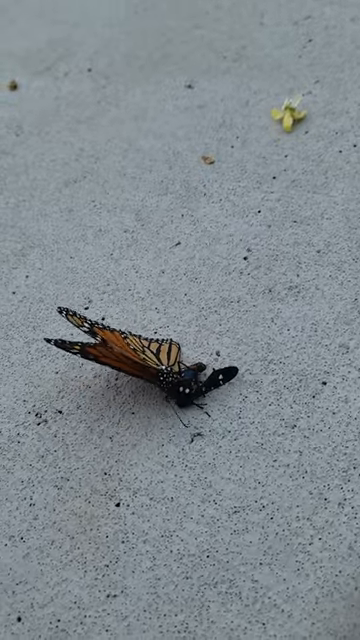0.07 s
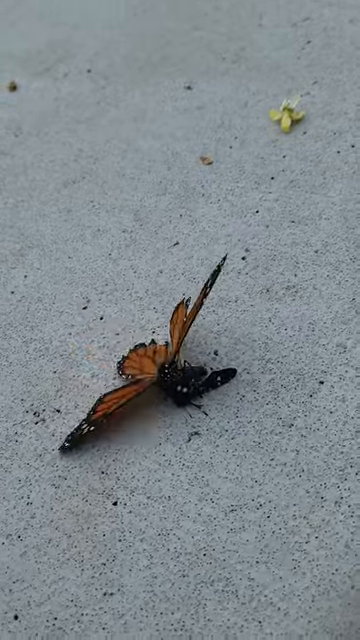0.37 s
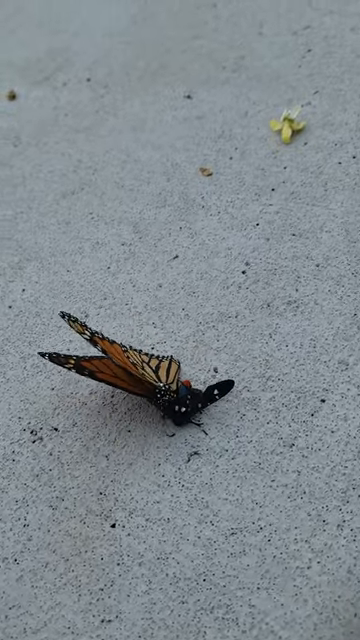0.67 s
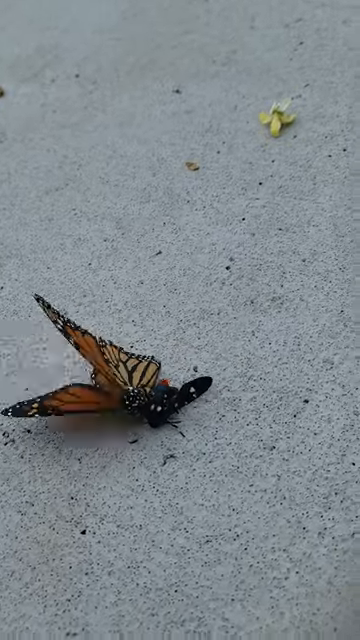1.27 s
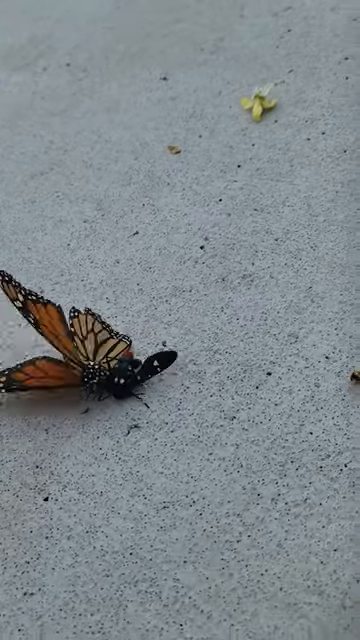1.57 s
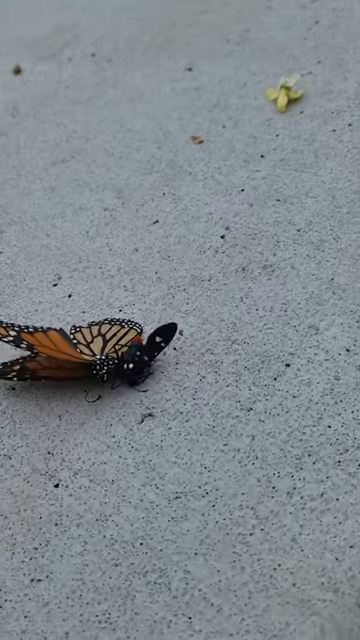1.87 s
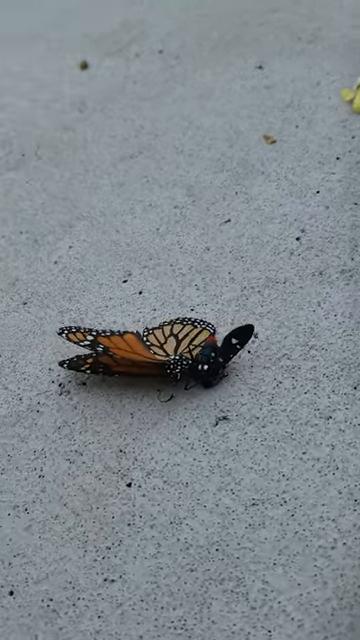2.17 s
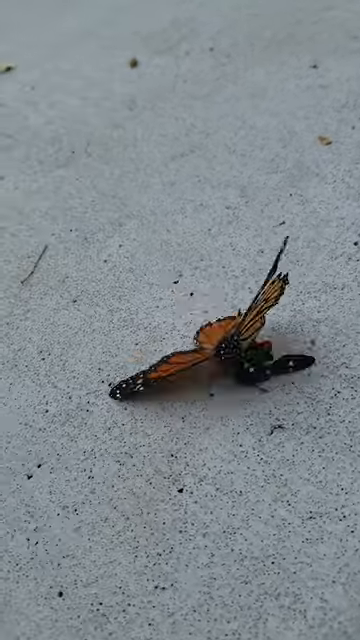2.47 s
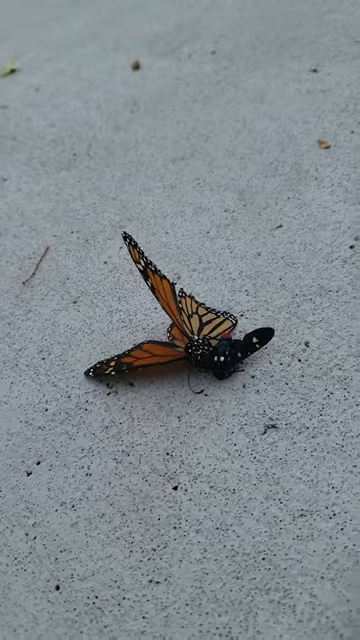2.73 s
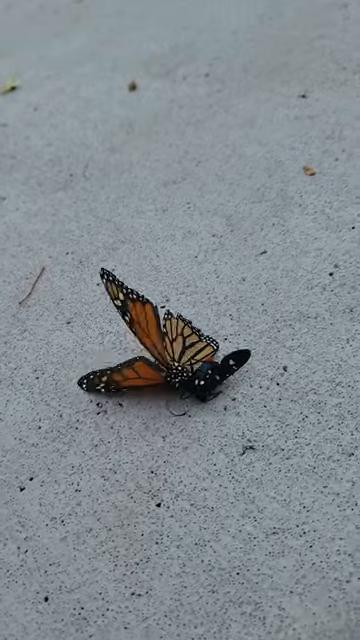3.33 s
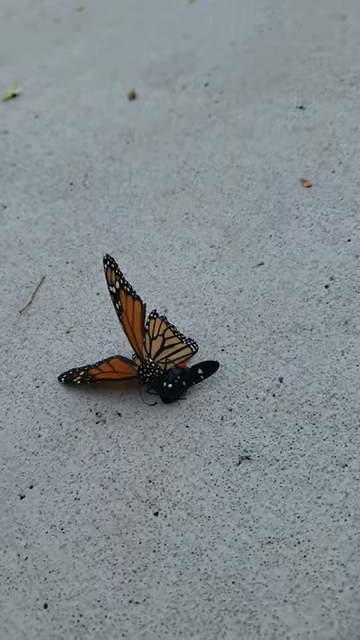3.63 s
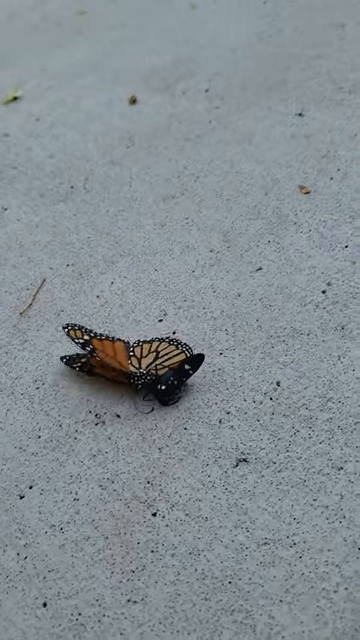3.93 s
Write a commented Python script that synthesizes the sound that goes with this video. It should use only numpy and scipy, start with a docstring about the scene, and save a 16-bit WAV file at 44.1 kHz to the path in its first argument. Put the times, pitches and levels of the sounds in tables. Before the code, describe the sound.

Fingers bump and click near the microphone outdoors while a breeze rumbles steadily.

```python
"""A concrete path outdoors, where a butterfly flaps and its wings faintly brush the ground.
Close to the right microphone, light contacts, probably fingers shifting on the case, give soft thuds,
dry ticks and a short rub. A breeze rumbles on both microphones.
Far off, birds whistle and twitter thinly over the hum of a town."""
import sys
import numpy as np
from scipy import signal
from scipy.fft import rfft, irfft
from scipy.io import wavfile
from scipy.ndimage import uniform_filter1d

SR = 44100
rng = np.random.default_rng(int(sys.argv[2]) if len(sys.argv) > 2 else 0)


def store_wav(level_fs):
    """Save 16-bit WAV to argv[1]."""
    pcm = np.round(np.clip(np.atleast_2d(level_fs), -1, 1) * 32767)
    wavfile.write(sys.argv[1], SR, pcm.T.astype(np.int16))


N = 176400
TIME = np.arange(N) / SR


def undb(db):
    """Decibels to gain."""
    return 10 ** (np.asarray(db) / 20)


def unit(x):
    """Scale to rms 1."""
    return x / np.sqrt(np.mean(x ** 2))


def colour(x, points):
    """Give x a spectrum of (Hz, relative dB) points; rms 1."""
    hz, db = np.array(points).T
    freqs = np.maximum(np.fft.rfftfreq(N, 1 / SR), 1)
    gain = undb(np.interp(np.log(freqs), np.log(hz), db))
    return unit(irfft(rfft(x) * gain, N))


def wander(rate):
    """A smooth random curve that changes rate times a second; rms 1."""
    hold = int(SR / rate)
    steps = np.repeat(rng.standard_normal(N // hold + 1), hold)
    return unit(uniform_filter1d(uniform_filter1d(steps, hold), hold)[:N])


def grains(rough_db):
    """Dense tiny clicks of uneven size."""
    return rng.standard_normal(N) * undb(rough_db * wander(1500))


def swells(rows):
    """Envelope of bell-shaped swells."""
    return sum(undb(db) * np.exp(-.5 * ((TIME - at) / half) ** 2) for at, half, db in rows)


def add(out, at, sound):
    """Mix a sound in at a time in seconds."""
    i = int(at * SR)
    out[i:i + len(sound)] += sound[:max(N - i, 0)]


def sides(left_db=0, right_db=0):
    """Gains for the two microphones."""
    return undb([[left_db], [right_db]])


# Wing strokes on the path. Each row: peak time and half length in seconds, level on the left in dB.
WING_STROKES = [(2.495, 0.034, -72.5), (2.62, 0.026, -74), (3.44, 0.043, -72.5), (3.555, 0.019, -75)]
# Their thin hiss. Each row: frequency in Hz, relative level in dB.
WING_SPECTRUM = [(3000, -27), (6000, -5), (8000, 4), (11000, 1.5), (13000, -13), (16000, -7)]

def wings():
    """Wing edges scrape over the grain of the concrete, left of centre."""
    scrape = np.array([colour(grains(rough_db=4), WING_SPECTRUM) for _ in range(2)])
    return scrape * swells(WING_STROKES) * sides(right_db=-7)


# Soft contacts close to the right microphone. Each row: time in seconds, thud level in dB,
# thud pitch in Hz, grit level in dB, grit decay time in seconds.
TOUCHES = [(1.173, -39.5, 221, -62.5, 0.037), (1.319, -37.5, 212, -55, 0.008),
           (1.408, -30, 161.4, -58.5, 0.032), (1.55, -30, 188, -57, 0.016), (1.743, -33, 168, -61, 0.011),
           (1.756, -27, 142, -55, 0.0057), (1.904, -29, 130, -53, 0.014), (2.016, -30, 134, -76, 0.012),
           (2.071, -26.5, 129, -54, 0.0071), (2.077, -25.5, 138, -64, 0.012),
           (2.123, -30.5, 127, -53, 0.0078), (2.14, -37, 124, -61, 0.038), (2.161, -25, 144, -55, 0.01),
           (2.175, -60, 151, -73, .009), (2.267, -21, 128, -58.5, 0.015), (2.407, -49, 170, -60, 0.0044),
           (2.947, -30.5, 163, -56, 0.023)]
# Friction on the case. Each row: frequency in Hz, relative level in dB.
GRIT_SPECTRUM = [(500, -25), (1000, 4), (3000, -6.5), (5500, -16.5), (9500, -15), (11500, -6.5),
                 (12600, -12), (13600, -24), (16000, -31)]
THUD_RISE_S, THUD_FALL_S = .003, .0098
GRIT_ROUGH_DB, GRIT_LEFT_DB = 2, -15

def touches():
    """Each soft contact thuds in the case and slides a little, with a gritty hiss."""
    t = TIME[:N // 20]
    thuds, slide = np.zeros(N), np.zeros(N)
    envelope = (1 - np.exp(-t / THUD_RISE_S)) ** 2 * np.exp(-t / THUD_FALL_S)
    envelope /= envelope.max()
    for at, thud_db, hz, grit_db, decay_s in TOUCHES:
        phase = 2 * np.pi * hz * t
        overtone = undb(-4) * np.sin(1.93 * phase) * np.exp(-t / .006)
        add(thuds, at - THUD_RISE_S, undb(thud_db) * envelope * (np.sin(phase) + overtone))
        add(slide, at, undb(grit_db) * np.exp(-t / decay_s))
    slide = uniform_filter1d(slide, size=260)  # the contact builds over a few ms
    grit = np.array([colour(grains(GRIT_ROUGH_DB), GRIT_SPECTRUM) for _ in range(2)])
    return thuds * sides(left_db=-20.5) + slide * grit * sides(left_db=GRIT_LEFT_DB)


# Dry ticks close to the right microphone. Each row: start in seconds, ring level in dB,
# ring pitch in Hz, snap level in dB, case level in dB.
TICKS = [(0.455, -48, 655, -63, -45), (1.744, -56, 1890, -49, -49), (1.905, -32.5, 1050, -43, -47),
         (2.017, -39, 1920, -39.5, -40.5), (2.127, -65, 1740, -66, -44), (2.1381, -55, 1860, -67, -43),
         (2.174, -45, 1940, -55, -45.5), (2.2627, -39.5, 1840, -40.5, -41.5),
         (2.408, -39.5, 1860, -43, -38.5)]
# Modes of the case. Each row: frequency in Hz, dB above the tick's case level, seconds to fall 60 dB.
CASE_MODES = [(217, 13.5, 0.02), (530, 11, 0.0059), (4200, -4, 0.0033), (6230, -19, 0.0027)]
RING_T60_S, RING_RISE_S, SNAP_DECAY_S = .008, .0002, .0005

def ticks():
    """A bright snap, then a few milliseconds of ringing in the case."""
    t = TIME[:N // 80]
    rings, snaps = np.zeros(N), np.zeros(N)

    def mode(hz, t60):
        """One damped resonance."""
        return np.sin(2 * np.pi * hz * t) * np.exp(-np.log(1000) * t / t60)

    case = sum(undb(db) * mode(hz, t60) for hz, db, t60 in CASE_MODES)
    attack = 1 - np.exp(-t / RING_RISE_S)
    for at, ring_db, hz, snap_db, case_db in TICKS:
        ring = undb(ring_db) * mode(hz, RING_T60_S) - undb(case_db) * case
        add(rings, at, ring * attack)
        add(snaps, at, undb(snap_db) * np.exp(-t / SNAP_DECAY_S))
    grit = colour(rng.standard_normal(N), GRIT_SPECTRUM)
    return (rings + snaps * grit) * sides(left_db=-18)


# Rubs on the case. Each row: peak time and half length in seconds, level on the right in dB.
RUBS = [(2.065, 0.029, -64), (2.15, 0.036, -63.5)]
# Their rasp. Each row: frequency in Hz, relative level in dB.
RUB_SPECTRUM = [(800, -20), (2000, -2.5), (3000, 6), (4000, -3), (5200, -14), (8000, -15), (16000, -14)]

def rubs():
    """A finger slides over the case beside the right microphone."""
    rasp = colour(grains(GRIT_ROUGH_DB), RUB_SPECTRUM)
    return rasp * swells(RUBS) * sides(left_db=GRIT_LEFT_DB)


# Breeze right on the microphones. Each row: time in seconds, left and right level in dB before trim.
BREEZE_LEVELS = [(0, -38.5, -45.5), (.6, -45.5, -46.5), (1.15, -44, -44.5), (1.498, -43, -41.5),
                 (1.95, -35, -44), (2.25, -41.5, -37), (2.52, -39.5, -44), (2.9, -38, -37.5),
                 (3.2, -41.5, -45.5), (3.7, -40, -48.5), (4, -37.5, -24.5)]
# Gusts on the left. Each row: peak time and half length in seconds, level in dB before trim.
GUSTS = [(.36, .035, -27), (.44, .015, -32), (.6, .025, -32), (2.285, .025, -25), (2.36, .02, -30),
         (2.71, .03, -26), (2.89, .04, -32), (3.45, .02, -26), (3.985, .02, -23)]
# The rumble of both. Each row: frequency in Hz, relative level in dB.
WIND_SPECTRUM = [(15, -18), (28, -32), (48, -1), (68, 3), (90, -4.5), (125, -2), (165, -9.5), (230, -23),
                 (400, -34), (1000, -54.5), (3000, -63.5), (16000, -120)]
BREEZE_TRIM_DB, GUST_TRIM_DB, SHARED_POWER = -2.5, -.5, .45

def breeze():
    """Eddies rumble on both microphones, partly shared; gusts catch the left one."""
    times, left_db, right_db = np.array(BREEZE_LEVELS).T
    shared, left, right, gust = (colour(rng.standard_normal(N), WIND_SPECTRUM) for _ in range(4))

    def rumble(own, db):
        """The eddies at one microphone."""
        eddies = np.sqrt(SHARED_POWER) * shared + np.sqrt(1 - SHARED_POWER) * own
        return eddies * undb(np.interp(TIME, times, db) + BREEZE_TRIM_DB)

    gusts = gust * swells(GUSTS) * undb(GUST_TRIM_DB)
    return np.array([rumble(left, left_db) + gusts, rumble(right, right_db)])


# Distant whistles and chirps. Each row: start and length in seconds, pitch, glide and quiver in Hz,
# level in dB, the echo's share of the power from 0 to 1.
WHISTLES = [(.185, 0.07, 4440, -380, 81, -65.5, 0.8), (.228, 0.047, 4117, -19, 52, -59, 0.83),
            (.29, 0.067, 4160, 62, 9.7, -65.5, 0.65), (.38, 0.054, 4116, -48, 28, -68, 0.44),
            (.24, .09, 8330, -3, 34, -79, 0.8), (.39, 0.075, 6100, 60, 81, -76, 0.5),
            (.55, .07, 6270, -2, 57, -78, 0.4), (.37, 0.22, 2800, -40, 100, -75.5, 1),
            (.61, 0.068, 2780, 20, 83, -72.5, 1), (1.194, 0.072, 4530, 194, 180, -78, .9),
            (1.39, 0.07, 6150, 200, 62, -87, 0.6), (1.682, .24, 2608, -17, 48, -83.5, 0.72),
            (1.91, 0.15, 6240, 250, 91, -77, .9), (2.08, 0.088, 2900, -110, 29, -65.5, 0.3),
            (2.328, 0.081, 4500, -86, 104, -69.5, 0.88), (2.44, 0.14, 4470, -65, 180, -73, 0.8),
            (2.58, 0.064, 4380, -66, 90, -70, 0.7), (2.5, 0.093, 7000, -100, 150, -77, .9),
            (2.93, 0.17, 4510, -120, 200, -76.5, 0.9), (3.08, 0.082, 4290, -53, 60, -73, 0.86),
            (3.29, 0.084, 4356, -69, 41, -70, 0.6), (3.39, 0.045, 4260, 50, 35, -69, 0.76),
            (3.391, 0.27, 2567, -68, 69, -65, 0.96), (3.63, 0.069, 4530, -250, 170, -74, .9),
            (3.74, 0.22, 2610, -25.5, 102, -63, 0.96), (3.819, 0.056, 4165, 56, 15, -65, 0.46),
            (3.955, 0.036, 8610, -350, 76, -58, 1)]
# High phrases, far off. Each row: start and length in seconds, pitch, drift and scatter in Hz,
# base level in dB.
TWITTERS = [(-.03, 0.36, 8950, -600, 1000, -81.5), (0.185, 0.31, 9050, -100, 496, -80.5),
            (0.319, 0.25, 7050, -100, 890, -77.5), (1.197, .4, 8080, -350, 558, -79.5),
            (1.317, 0.19, 6950, 0, 550, -83.5), (1.925, 0.39, 7540, 300, 750, -79),
            (2.66, 0.36, 7470, 102, 1053, -77), (3.469, 0.33, 7390, -100, 703, -78.5)]
NOTES_PER_S, BIRD_FADE_S, ECHO_T60_S = 80, .03, .52

def birds():
    """Thin whistles and quick twitters; the farther the bird, the more is echo from walls and trees."""
    direct, reflected = np.zeros(N), np.zeros(N)
    quiver = wander(900)
    tail = rng.standard_normal((2, N // 4)) * np.exp(-np.log(1000) * TIME[:N // 4] / ECHO_T60_S)
    tail /= np.sqrt(np.sum(tail ** 2, axis=1, keepdims=True))

    def note(at, length, hz, glide_hz, quiver_hz, db, echo):
        """One gliding, quivering tone, split between the direct path and the echo."""
        t = TIME[:int(length * SR)]
        pitch = hz + glide_hz * t / length + quiver_hz * np.roll(quiver, -int(at * SR))[:len(t)]
        fade = np.clip(np.minimum(t, length - t) / min(BIRD_FADE_S, length / 2), 0, 1)
        tone = undb(db) * np.sqrt(2) * fade * np.sin(2 * np.pi * np.cumsum(pitch) / SR)
        add(direct, max(at, 0), np.sqrt(1 - echo) * tone)
        add(reflected, max(at, 0), np.sqrt(echo) * tone)

    for whistle in WHISTLES:
        note(*whistle)
    for at, length, hz, drift_hz, scatter_hz, base_db in TWITTERS:
        jitter = rng.uniform(-1, 1, size=(int(length * NOTES_PER_S), 3))
        for k, (late, high, loud) in enumerate(jitter):
            since = (k + late / 2) / NOTES_PER_S
            pitch = hz + drift_hz * since / length + scatter_hz * high
            arch_db = 6 * np.sin(np.pi * since / length) - 1.5  # loudest in mid-phrase
            db = base_db + arch_db + 2 * loud
            note(at + since, length=.029, hz=pitch, glide_hz=-327, quiver_hz=110, db=db, echo=.91)
    return direct + signal.fftconvolve(reflected[None], tail, axes=1)[:, :N]


# Far traffic and open air. Each row: frequency in Hz, relative level in dB.
TRAFFIC_SPECTRUM = [(40, -5.5), (70, 0.5), (150, -4.5), (220, -13.5), (310, -20), (420, -18.5),
                    (600, -24.5), (1000, -30.5), (1500, -35.5), (2400, -42.5), (4000, -51), (5500, -56),
                    (8000, -51.5), (11000, -54.5), (13500, -58), (16000, -59.5)]
# Far machinery. Each row: pitch in Hz, mean level on the left in dB.
MACHINE_TONES = [(398, -71.5), (459, -71)]
TRAFFIC_DB, ALIKE_BELOW_HZ, LEFT_LAG_S = -48.5, 660, .0004

def town():
    """Far traffic, alike on both sides in the bass, and a wavering machine hum, off to the right."""
    alike = 1 / (1 + (np.fft.rfftfreq(N, 1 / SR) / ALIKE_BELOW_HZ) ** 4)
    mid, side = (rfft(rng.standard_normal(N)) * np.sqrt(1 + sign * alike) for sign in (1, -1))
    noise = irfft(np.array([mid + side, mid - side]), N)
    traffic = colour(noise, TRAFFIC_SPECTRUM) * undb(TRAFFIC_DB)
    hum = np.zeros(N)
    for hz, db in MACHINE_TONES:
        level = undb(db + 2 * wander(6.71))
        pitch = hz + 3 * wander(15)
        hum += level * np.sqrt(2) * np.sin(2 * np.pi * np.cumsum(pitch) / SR)
    left, right = traffic + hum
    return np.array([np.roll(left, int(LEFT_LAG_S * SR)), right]) * sides(right_db=4.5)


def scene():
    """Everything that reaches the two microphones on the path."""
    return wings() + touches() + ticks() + rubs() + breeze() + birds() + town()


def record(dry):
    """The recorder cuts the treble steeply above 15.9 kHz."""
    return signal.sosfilt(signal.ellip(10, .1, 70, 15900, fs=SR, output="sos"), dry)


dry = scene()
out = record(dry)
store_wav(out)
```